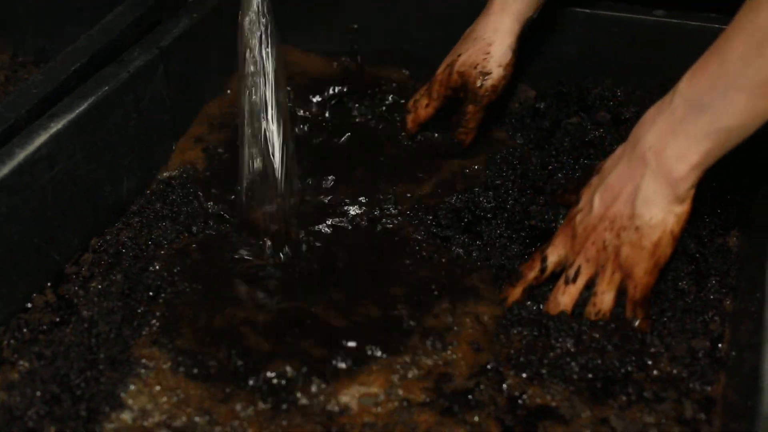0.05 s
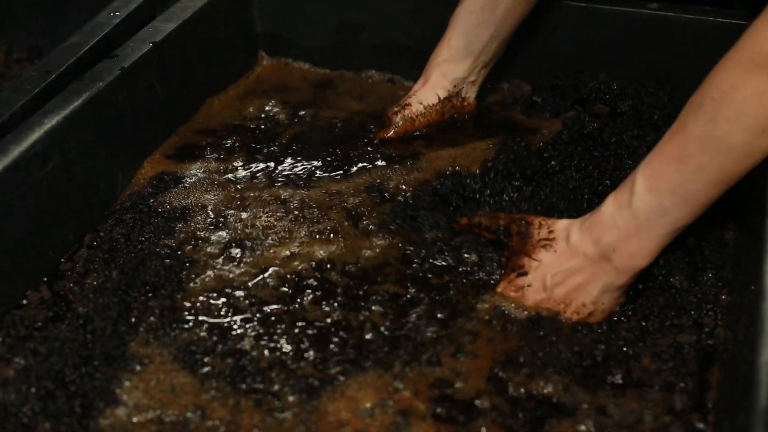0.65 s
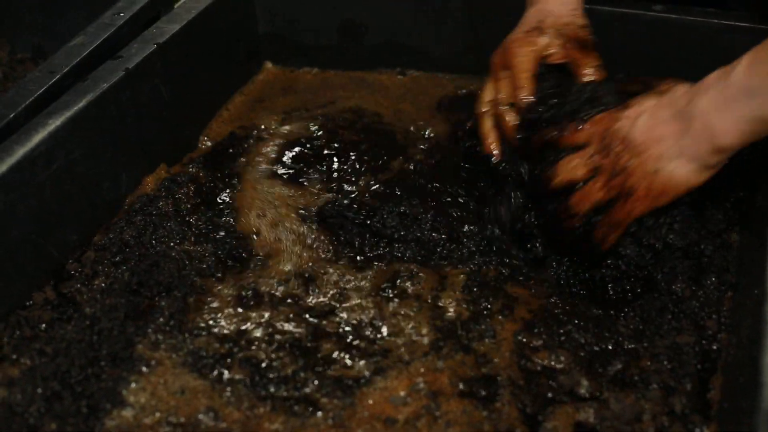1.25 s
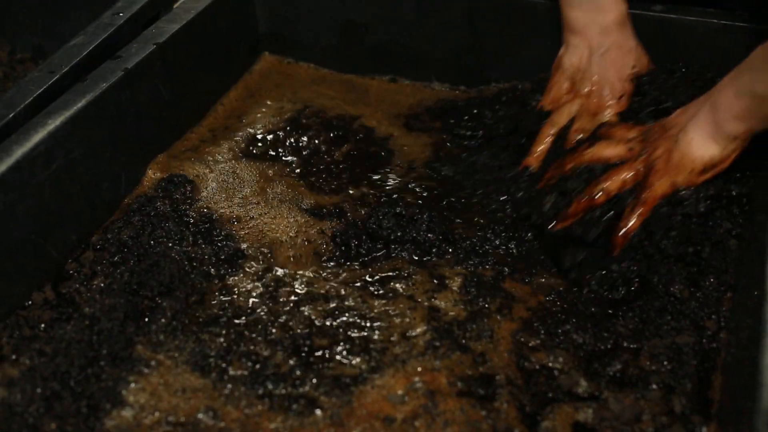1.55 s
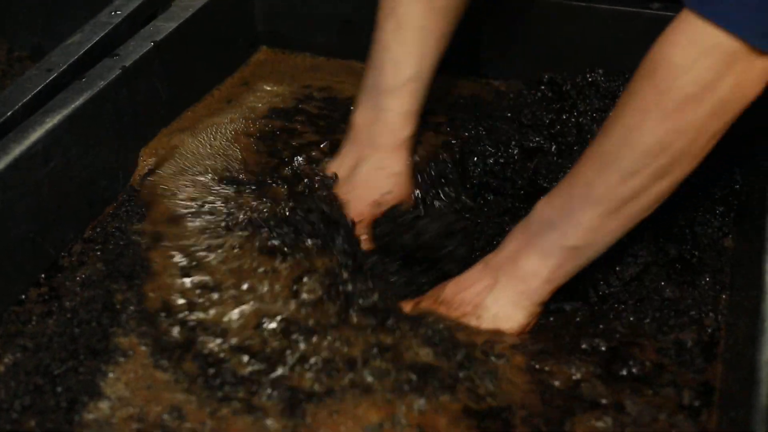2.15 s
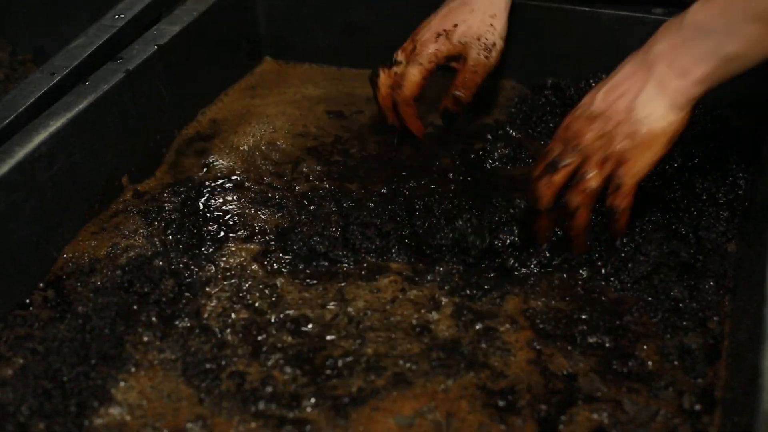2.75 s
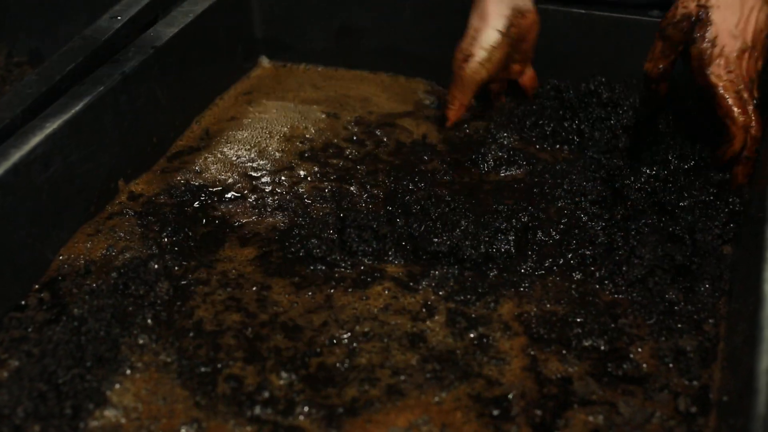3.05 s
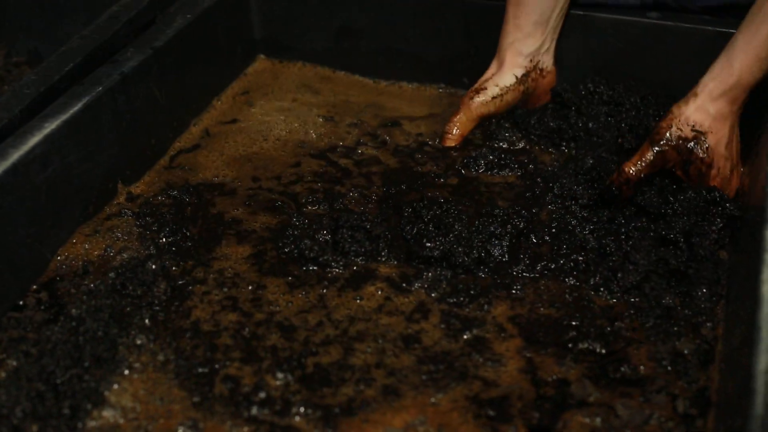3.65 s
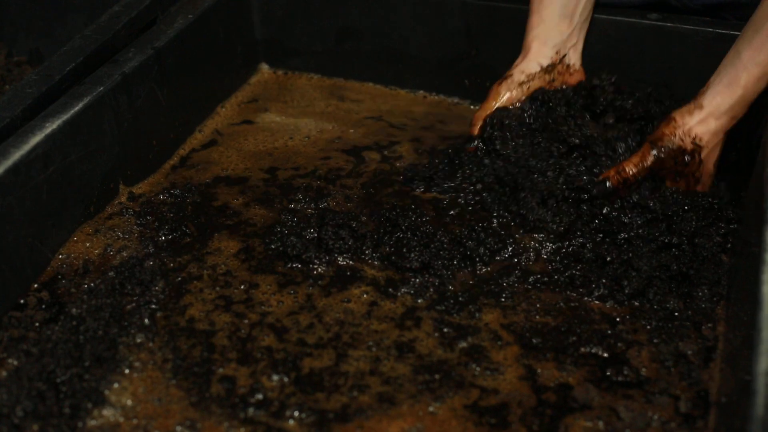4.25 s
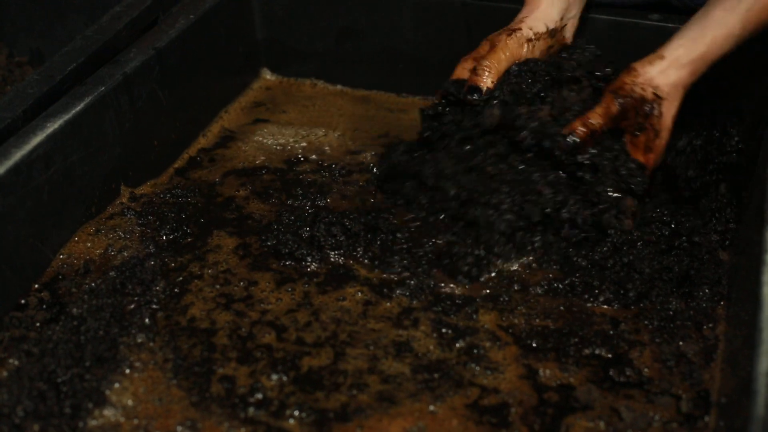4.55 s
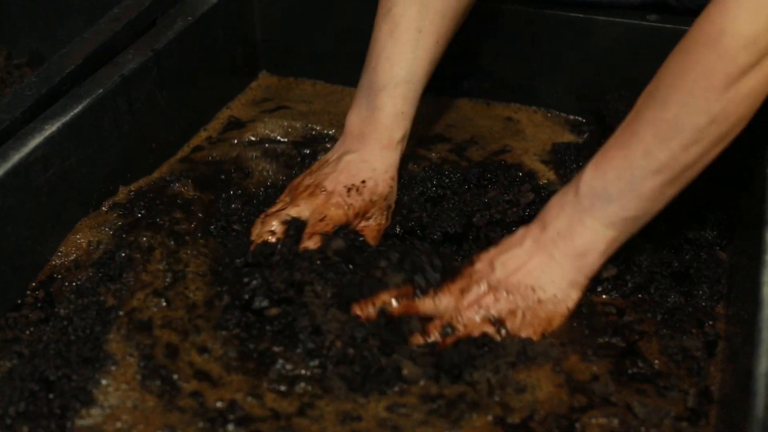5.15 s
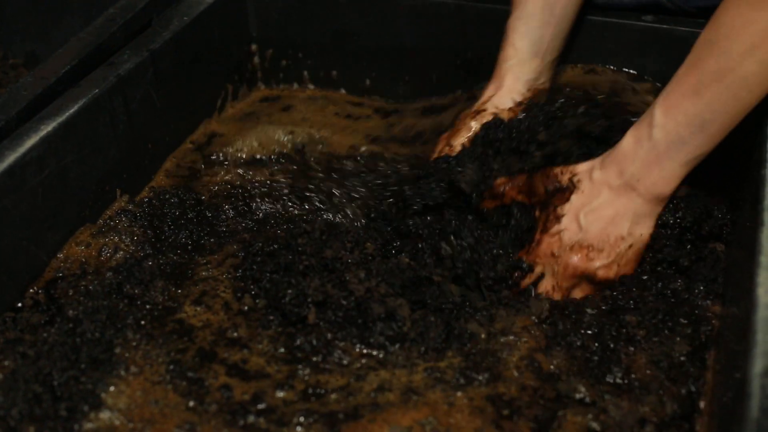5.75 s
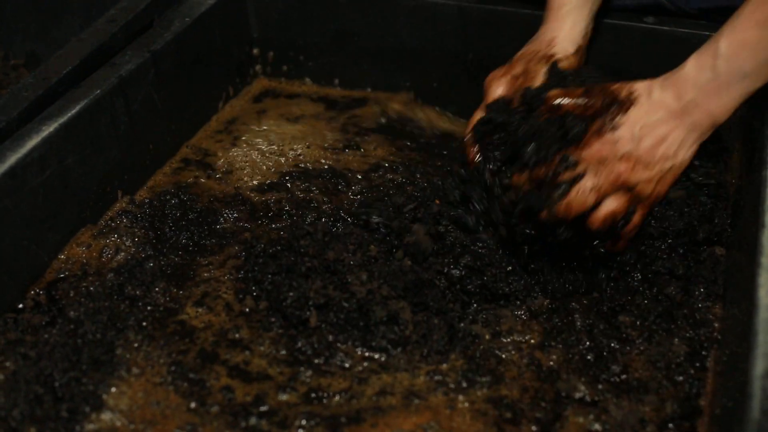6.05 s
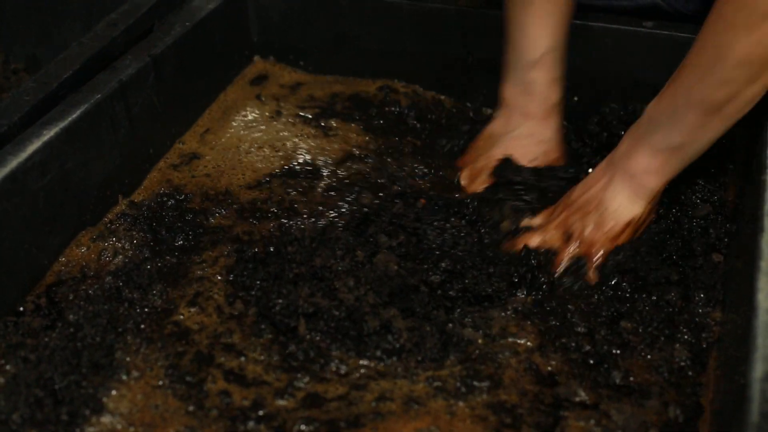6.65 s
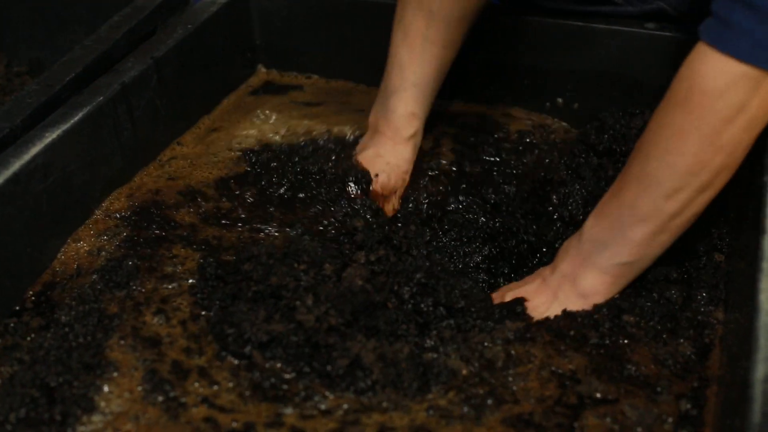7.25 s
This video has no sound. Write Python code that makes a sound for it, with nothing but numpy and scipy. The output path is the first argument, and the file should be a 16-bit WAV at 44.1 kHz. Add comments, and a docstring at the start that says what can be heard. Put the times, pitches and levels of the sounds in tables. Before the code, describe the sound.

A splash of water, then hands squelch and knead wet, grainy mash in a vat, with a few loud, hollow knocks.

```python
"""Hands scoop and knead wet, grainy mash in a vat, close to a single microphone in a quiet workshop.
Grains slip in gritty strokes, wet films smack, air pockets squish and the liquid sloshes underneath.
At the start the last of a stream of water splashes in, leaving bubbles and a thinning, ticking froth.
Around two to three seconds in, a hollow vessel takes a few loud knocks and its thin wall booms.
Behind it all are a short reverberation and the low rumble and hiss of the room."""
import sys
import numpy as np
from scipy import signal
from scipy.io import wavfile

SR = 44100
rng = np.random.default_rng(int(sys.argv[2]) if len(sys.argv) > 2 else 0)


def generate_wav(sig):
    """Save sig (samples, or channels by samples) to the path in sys.argv[1] as 16-bit PCM at SR."""
    pcm = np.round(np.clip(np.atleast_2d(sig).T, -1, 1) * 32767).astype(np.int16)
    wavfile.write(sys.argv[1], SR, pcm)


N = 330309
TIME = np.arange(N) / SR
HZ = np.fft.rfftfreq(4096, 1 / SR) + 1  # frequency axis of the filters

# room tone of the workshop: f/Hz, density/dB
ROOM_SPECTRUM = [(20, -21), (55, -11.5), (110, 3), (300, -1), (700, -4), (1300, -5.5), (2200, -8),
                 (5000, -11), (11000, -18), (16000, -25)]
# reverberation of the workshop: f/Hz, t60/s
ROOM_DECAY = [(150, 0.52), (1000, 0.2), (4000, 0.064), (12000, 0.018)]
# larger air bubbles ringing in the liquid: t/s, level/dB, f/Hz
BUBBLE_PINGS = [(0.048, -21, 810), (.107, -28.5, 890), (0.141, -23.5, 1010), (0.163, -30, 1150),
                (.172, -25, 1350), (0.305, -29, 2780), (0.319, -23, 1077), (.356, -28, 1890),
                (0.432, -32, 1980), (0.453, -28, 302), (1.093, -29, 657), (3.684, -31.5, 2250),
                (4.001, -31, 192), (4.15, -32.5, 2700), (4.237, -26, 5180), (4.307, -31.5, 177),
                (5.916, -30, 276), (6.235, -30, 297)]
# water hitting the surface: f/Hz, density/dB
SPLASH_SPECTRUM = [(70, -61), (180, -7), (270, 0), (450, 0.5), (850, -0.5), (2000, 2.5), (5500, 2.5),
                   (11000, -3.5), (16000, -11)]
# the vessel's wall, struck or dragged: t/s, length/s, level/dB, f/Hz
WALL_BOOMS = [(1.858, 0.025, -15, 326), (2.23, 0.085, -42, 310), (2.367, 0.019, -23.5, 277.4),
              (2.617, .04, -36, 287), (2.67, 0.021, -25, 288), (2.84, 0.038, -35, 260)]
# heavier blows shaking what the vessel stands on: t/s, level/dB
STAND_THUDS = [(1.858, -32), (2.68, -43), (2.845, -42)]
# blows on the vessel: t/s, level/dB, treble corner/Hz, bass gain/dB
VESSEL_BLOWS = [(1.856, -5.5, 2070, 7), (1.861, -10, 734, 14), (1.89, -18, 646, 21),
                (1.93, -18.5, 1120, 18.5), (2.224, -25, 1790, -3), (2.366, -2.5, 4730, -5.5),
                (2.6674, -8, 4720, 0.5), (2.683, -6, 2100, -14), (2.837, -11, 2200, -7.5),
                (2.922, -22.5, 1570, 7.5), (2.965, -29, 2500, -6)]
# the vessel's distinct modes: f/Hz, level/dB, t60/s
VESSEL_MODES = [(138, -12, 0.4), (214, -6, 0.22), (234, -5, 0.3), (331, -5, 0.48), (366, -5, 0.45),
                (470, 1, 0.2), (619, -8, 0.3), (864, -2, 0.19), (1118, -4, 0.2), (1252, 2, 0.13),
                (1575, -8, 0.25), (1886, -7, 0.25), (2545, 1, 0.09)]
# the dense modes of its shell: f/Hz, density/dB
SHELL_SPECTRUM = [(45, -46), (85, -15), (145, -6), (270, 7.5), (420, -3.5), (560, -3.5), (950, 2.5),
                  (1400, 3.5), (2400, -3), (3500, -5), (6000, -7.5), (15000, -13.5)]
# decay of those dense modes: f/Hz, t60/s
SHELL_DECAY = [(100, 0.58), (300, 0.43), (1200, 0.4), (2500, 0.24), (6000, 0.26), (14000, 0.18)]
# liquid moving in the vat: f/Hz, density/dB
SLOSH_SPECTRUM = [(50, -21), (124, 0), (200, -5), (310, 1.5), (700, -8.5), (1700, -14), (5000, -36)]
# the liquid surges and settles: t/s, length/s, level/dB
LIQUID_SURGES = [(0.757, 0.24, -45), (1.38, 1, -47.5), (3.044, 0.47, -39), (3.44, 0.49, -49.5),
                 (4.783, 0.73, -47), (5.454, 0.27, -43.5), (6.712, 0.43, -50)]
# fizz of squeezed mash: f/Hz, density/dB
FIZZ_SPECTRUM = [(300, -30), (660, 7.5), (850, 1.5), (1290, 2), (2950, 0), (3500, -2), (7000, -11.5),
                 (16000, -24)]
# palms press and heave the mash: t/s, length/s, level/dB
PALM_PRESSES = [(0.996, 0.12, -42.5), (1.756, 0.39, -45), (2.264, 0.25, -41), (3.134, 0.3, -48),
                (3.376, 0.35, -49), (3.904, 0.48, -45.5), (4.525, 0.31, -43), (4.826, 0.26, -35.5),
                (5.078, 0.19, -36.5), (5.262, 0.17, -42), (5.455, 0.55, -49)]
# air pockets between hands, mash and vat wall: f/Hz, half width/Hz, peak/dB
AIR_POCKETS = [(1306, 75, 6.5), (2200, 490, 5.5), (3090, 86, 3.5)]
# air forced through a pocket that shrinks or opens: t/s, length/s, level/dB, start f/Hz, end f/Hz
POCKET_SQUISHES = [(1.409, 0.03, -41.5, 1160, 2200), (3.125, 0.038, -42.5, 610, 684),
                   (3.586, 0.055, -50, 2730, 4160), (3.899, 0.02, -45, 2760, 3870),
                   (4.891, 0.21, -43.5, 2800, 3000), (6.084, 0.027, -32.5, 2150, 1970),
                   (6.161, 0.075, -37, 2160, 2400)]
# wet films snapping: t/s, level/dB, centre f/Hz
FILM_SMACKS = [(0.12, -18, 4500), (0.204, -8, 5500), (0.22, -5.5, 4970), (0.335, -17, 3570),
               (0.378, -15.5, 10000), (1.092, -19.5, 1520), (1.099, -22, 4060), (1.157, -25.5, 1060),
               (1.285, -23, 5000), (1.540, -21, 2170), (3.377, -26, 1790), (3.995, -20.5, 1530),
               (4.087, -25, 1460), (4.303, -26.5, 1460), (4.400, -24, 4000), (4.921, -24, 12000),
               (5.336, -26, 1900), (6.303, -28, 2600), (6.4896, -16, 1590), (6.829, -16.5, 2520),
               (6.861, -24.5, 11100), (6.975, -24.5, 6050), (7.303, -26.5, 2480)]
# wet grains slipping: f/Hz, density/dB
GRIT_SPECTRUM = [(300, 2), (600, 4), (1000, -3), (2300, -2.5), (3200, -3), (5000, -5.5), (10000, -17.5),
                 (16000, -41)]
# clumps pulling loose: t/s, level/dB, pocket f/Hz
CLUMP_SQUELCHES = [(1.048, -40, 2000), (1.088, -30.5, 730), (2.242, -31, 1090), (3.993, -29, 1330),
                   (4.087, -33, 1410), (4.232, -38.5, 1850), (4.302, -31.5, 1360), (4.397, -38, 2900),
                   (4.466, -40, 1600), (5.407, -38, 2800), (5.942, -33.5, 2200)]
# fingers raking through the grit: t/s, length/s, level/dB, low edge/Hz
FINGER_STROKES = [(6.088, 0.046, -32.5, 537), (6.161, 0.058, -33, 980), (6.3, 0.11, -34, 600),
                  (6.512, 0.055, -32, 930), (6.591, 0.074, -34.5, 785), (6.766, 0.066, -34.5, 1010),
                  (6.891, 0.032, -34, 640), (7.031, 0.14, -36.5, 790), (7.301, 0.051, -29.5, 500),
                  (7.402, 0.024, -31.5, 700)]


def gain_of(db):
    """Decibels to amplitude."""
    return 10 ** (np.asarray(db) / 20)


def unit_rms(x):
    """Scales to rms 1."""
    return x / np.sqrt(np.mean(x ** 2) + 1e-20)


def curve(points, hz=HZ):
    """A table's values at hz, joined on a log-frequency axis."""
    f, value = np.transpose(points)
    return np.interp(np.log(hz + 1), np.log(f + 1), value)


def add(mix, s, sound):
    """Adds a sound to the mix at time s."""
    part = mix[max(round(s * SR), 0):][:len(sound)]
    part += sound[:len(part)]


def rolloff(ratio, order):
    """Decibels of a filter slope that falls where the ratio passes 1."""
    return -10 * np.log10(1 + ratio ** (2 * order))


def peak(hz, half_width, db):
    """Decibels of a resonant peak along HZ."""
    return db / (1 + ((HZ - hz) / half_width) ** 2)


def colour(x, db):
    """Minimum-phase filter with the gain db along HZ."""
    log_gain = np.log(gain_of(np.r_[db, db[-2:0:-1]]) + 1e-5)
    taps = np.fft.ifft(np.exp(np.conj(signal.hilbert(log_gain)))).real
    return signal.fftconvolve(x, taps[:len(db)])[:len(x)]


def resonate(x, hz, width):
    """A resonance of gain 1 that follows the curve hz."""
    turn = np.exp(2j * np.pi * np.cumsum(hz) / SR)
    pole = np.exp(-np.pi * width / SR)
    return 2 * (turn * signal.lfilter([1 - pole], [1, -pole], x / turn)).real


def wander(n, per_s):
    """A random drift with a spread of about 1."""
    return np.interp(np.arange(n) / SR * per_s, np.arange(SR), rng.standard_normal(SR))


def decay(t, t60):
    """Exponential fall by 60 dB in t60."""
    return np.exp(-np.log(1000) * t / t60)


def push(t, length, rise_s, sag_db, t60):
    """One movement: it builds up, sags while it lasts, then dies away."""
    age = np.maximum(t, 0)
    sag = gain_of(-sag_db * np.minimum(age / length, 1))
    return np.minimum(age / rise_s, 1) * sag * decay(np.maximum(age - length, 0), t60)


def swell(t, width_s):
    """A smooth rise and fall around t = 0."""
    return (1 + (t / width_s / 2) ** 2) ** -3


def crackle(n, per_s, spread_db):
    """Random clicks, many small and a few large; rms 1."""
    size = gain_of(spread_db * np.minimum(rng.exponential(1, n), 4))
    return unit_rms(size * np.sign(rng.standard_normal(n)) * (rng.random(n) < per_s / SR))


def ticks(n, per_s, spread_db, low_hz):
    """Crisp pops of thin films, strongest in the octave above low_hz; rms 1."""
    band_db = rolloff(low_hz / HZ, order=1) + rolloff(HZ / low_hz / 2, order=1)
    return unit_rms(colour(crackle(n, per_s, spread_db), band_db))


def tail(t60s):
    """Dense reflections, each band dying at its own speed; energy 1."""
    hz, t, bands = signal.stft(np.sign(rng.standard_normal(SR // 2)), SR, nperseg=128)
    x = signal.istft(bands * decay(t, curve(t60s, hz)[:, None]), SR)[1]
    return x / np.linalg.norm(x)


def wavering(n, hz):
    """A tone of unsteady pitch; rms 1."""
    pitch = hz * (1 + 0.047 * wander(n, per_s=89.6))
    return unit_rms(np.sin(2 * np.pi * np.cumsum(pitch) / SR))


def room_tone():
    """Steady rumble and hiss of the workshop."""
    return gain_of(-47.5) * unit_rms(colour(rng.standard_normal(N), curve(ROOM_SPECTRUM)))


def froth():
    """Froth left by the pour ticks as it bursts, and slowly fades."""
    start_db, fade_db_per_s = -50.5, 4
    return gain_of(start_db - fade_db_per_s * TIME) * ticks(N, per_s=590, spread_db=2.4, low_hz=4500)


def bubble(hz, t60, glide):
    """A damped tone that rises as the bubble nears the surface."""
    t = np.arange(0, t60, 1 / SR)
    return np.sin(2 * np.pi * hz * t * (1 + glide * t / t60)) * decay(t, t60)


def swarm(n, low_hz, high_hz, per_s, cycles, sizes):
    """Tiny bubbles of many sizes, each size popping per_s times a second and ringing briefly; rms 1."""
    out = np.zeros(n + SR // 4)
    for hz in np.geomspace(low_hz, high_hz, sizes):
        ping = bubble(hz, cycles / hz, glide=0.014) * np.sqrt(hz)
        onset, strength = rng.random((round(per_s * n / SR), 2)).T[:, :, None]
        np.add.at(out, (onset * n).astype(int) + np.arange(len(ping)), strength ** 2 * ping)
    return unit_rms(out[:n])


def bubbles():
    """Single larger bubbles ring up within a cycle; the smallest die soonest."""
    out = np.zeros(N)
    rise_cycles, ring_cycles = 0.45, 114
    for s, db, hz in BUBBLE_PINGS:
        ping = bubble(hz, t60=min(0.035, ring_cycles / hz), glide=0.073)
        add(out, s, gain_of(db) * ping * np.minimum(TIME[:len(ping)] * hz / rise_cycles, 1))
    return out


def pour():
    """The stream splashes and glugs as it drags air under; it is cut off and a last slug follows."""
    out, t = np.zeros(N), TIME[:SR]
    stop_s, slug_s = 0.19, 0.3
    glugs_per_s, first_glug_s = 25, 0.045
    spray = unit_rms(colour(crackle(SR, per_s=3500, spread_db=3.4), curve(SPLASH_SPECTRUM)))
    spray *= gain_of(2 * wander(SR, per_s=161))
    pulses = np.cos(np.pi * glugs_per_s * (t - first_glug_s)) ** 4
    glugs = unit_rms(wavering(SR, hz=268) * pulses * gain_of(3 * wander(SR, glugs_per_s)))
    pings = swarm(SR, low_hz=674, high_hz=6200, per_s=7, cycles=33, sizes=40)
    water = spray + gain_of(-4.5) * pings + gain_of(-14) * glugs
    stream = gain_of(-31.5) * decay(np.maximum(t - stop_s, 0), t60=0.41)
    slug = gain_of(-41.5) * swell(t - slug_s, width_s=0.041)
    add(out, 0, (stream + slug) * water)
    return out


def booms():
    """The vessel's thin wall booms when struck and groans when dragged; its stand thuds underneath."""
    out, t = np.zeros(N), TIME[:SR // 2]
    thud_length_s, thud_hz = 0.03, 90
    thuds = [(s, thud_length_s, db, thud_hz) for s, db in STAND_THUDS]
    for s, length, db, hz in list(WALL_BOOMS) + thuds:
        envelope = push(t, length, rise_s=0.006, sag_db=0, t60=0.21)
        add(out, s, gain_of(db) * wavering(len(t), hz) * envelope)
    return out


def knocks():
    """Each blow on the vessel gives a short crack, a dense clatter of the shell and ringing modes."""
    out, t = np.zeros(N), TIME[:SR // 2]
    hz, mode_db, t60 = np.transpose(VESSEL_MODES)[:, :, None]
    sign = (-1) ** np.arange(len(hz))[:, None]  # neighbouring modes swing opposite ways
    attack = 1 - np.exp(-t / 0.00056)
    for s, db, treble_hz, bass_db in VESSEL_BLOWS:
        spot, grip = rng.standard_normal((2, len(hz), 1))  # both vary from blow to blow
        modes = np.sin(2 * np.pi * hz * (1 + 0.008 * grip) * t) * decay(t, t60)
        ring = (sign * gain_of(mode_db + 2.5 * spot) * modes).sum(0)
        crack = np.sign(rng.standard_normal(len(t))) * decay(t, t60=0.063)
        clatter = tail(SHELL_DECAY)[:len(t)]
        shell = colour(gain_of(4.5) * crack + gain_of(22) * clatter, curve(SHELL_SPECTRUM))
        # soft blows are dull, heavy ones carry more bass
        contact_db = rolloff(HZ / treble_hz, order=1) + rolloff(HZ / treble_hz / 2.33, order=2)
        weight_db = peak(0, 400, bass_db) + rolloff(70 / HZ, order=5)
        blow = (gain_of(-18.5) * ring + shell) * attack
        add(out, s, gain_of(db) * colour(blow, contact_db + weight_db))
    return out


def squishes():
    """Bursting films ring a pocket of air whose pitch slides and flutters as the hand deforms it."""
    out, t = np.zeros(N), TIME[:SR // 2]
    flutter, ragged_flow_db = 0.06, 4
    for s, length, db, from_hz, to_hz in POCKET_SQUISHES:
        hz = np.interp(t, [0, length], [from_hz, to_hz]) * (1 + flutter * wander(len(t), per_s=75.6))
        ring = crackle(len(t), per_s=2500, spread_db=1.5)
        ring *= gain_of(ragged_flow_db * wander(len(t), per_s=158))
        for _ in range(2):
            ring = resonate(ring, hz, width=0.21 * to_hz)
        add(out, s, gain_of(db) * unit_rms(ring) * push(t, length, rise_s=0.0032, sag_db=0, t60=0.076))
    return out


def smacks():
    """Films of liquid burst with a click, and the pocket behind them sputters for a moment."""
    out, t = np.zeros(N), TIME[:SR // 20]
    for s, db, hz in FILM_SMACKS:
        sputter = crackle(len(t), per_s=2200, spread_db=2.5) * decay(t, 0.029 * np.sqrt(2000 / hz))
        treble_db = rolloff(HZ / hz, order=1) + rolloff(HZ / hz / 3, order=1)
        click = colour((t == 0) + 0.24 * sputter, treble_db + rolloff(0.65 * hz / HZ, order=2))
        add(out, s, gain_of(db) * click / abs(click).max())
    return out


def mash(spectrum, spread_db, pings_db):
    """Two seconds of slipping grains and bursting bubbles, heard through the air pockets; rms 1."""
    shape_db = curve(spectrum) + sum(peak(hz, width, db) for hz, width, db in AIR_POCKETS)
    slips = unit_rms(colour(crackle(2 * SR, per_s=7000, spread_db=spread_db), shape_db))
    pings = swarm(2 * SR, low_hz=550, high_hz=14000, per_s=22, cycles=70, sizes=80)
    pings = unit_rms(colour(pings, shape_db + 10 * np.log10(HZ / 2000)))
    return unit_rms(slips + gain_of(pings_db) * pings)


def kneading():
    """Mash fizzes under the palms; the liquid below it sloshes."""
    fizz = np.resize(mash(FIZZ_SPECTRUM, spread_db=3, pings_db=-5.5), N)
    fizz *= gain_of(1.5 * wander(N, per_s=70))
    slosh = unit_rms(colour(crackle(N, per_s=900, spread_db=4.3), curve(SLOSH_SPECTRUM)))
    slosh *= gain_of(1.1 * wander(N, per_s=33))
    pressure = sum(gain_of(db) * push(TIME - s, length, rise_s=0.074, sag_db=3, t60=0.22)
                   for s, length, db in PALM_PRESSES)
    surge = sum(gain_of(db) * push(TIME - s, length, rise_s=0.069, sag_db=8, t60=0.33)
                for s, length, db in LIQUID_SURGES)
    return fizz * pressure + slosh * surge


def scooping():
    """Wet grains slip as fingers rake through them, and clumps pull loose with a short squelch."""
    out, t = np.zeros(N), TIME[:SR // 2]
    bubbly = mash(GRIT_SPECTRUM, spread_db=2, pings_db=-2)
    smooth = mash(GRIT_SPECTRUM, spread_db=3, pings_db=-5)
    pops = gain_of(-14.5) * ticks(2 * SR, per_s=450, spread_db=1.1, low_hz=5000)

    def grit(low_hz, pocket_db=0):
        """Half a second of slipping grains: deep strokes are bubbly, shallow ones thin and bright."""
        depth = np.clip((1100 - low_hz) / 200, 0, 1)
        grains = depth * bubbly + (1 - depth) * smooth + pops
        start = rng.integers(len(grains) - len(t))
        tilt_db_per_octave = np.log2(low_hz / 650)
        octaves = np.log2(np.maximum(HZ, low_hz) / 2000)
        shape_db = rolloff(low_hz / HZ, order=3) + tilt_db_per_octave * octaves + pocket_db
        stroke = unit_rms(colour(grains[start:start + len(t)], shape_db))
        return stroke * gain_of(wander(len(t), per_s=121.8))

    for s, length, db, low_hz in FINGER_STROKES:
        cavity_hz = rng.uniform(1900, 3100)  # each stroke opens a small cavity of its own
        cavity_db = peak(cavity_hz, 0.05 * cavity_hz, db=6)
        envelope = push(t, length, rise_s=0.0015, sag_db=0.5, t60=0.31)
        add(out, s, gain_of(db) * grit(low_hz, cavity_db) * envelope)
    for s, db, hz in CLUMP_SQUELCHES:
        pocket_db = peak(hz, 0.66 * hz, db=14.5) + rolloff(HZ / hz / 9.2, order=1)
        envelope = np.minimum(t / 0.00083, 1) * decay(t, t60=0.17)
        add(out, s, gain_of(db) * grit(0.3 * hz, pocket_db) * envelope)
    # a spray of wet grit swells and dies away as the hands dig in
    dig_s, middle_s = 0.808, t.mean()
    add(out, dig_s - middle_s, gain_of(-26.5) * grit(low_hz=1060) * swell(t - middle_s, width_s=0.057))
    return out


def scene():
    """The vat from close by, in mono, with the workshop's short reverberation 6 ms behind."""
    wet_work = pour() + scooping() + squishes() + kneading()
    blows = knocks() + booms()
    bursts = bubbles() + smacks() + froth()
    send = gain_of(-14) * wet_work + gain_of(-10.5) * bursts + gain_of(-20) * blows
    reverb = np.zeros(N)
    add(reverb, 0.006, signal.fftconvolve(send, tail(ROOM_DECAY)))
    return (wet_work + bursts + blows + reverb + room_tone())[None]


def record(dry):
    """The microphone chain rounds off peaks softly and cuts the top treble."""
    edge_hz = 15950
    lowpass = signal.firwin(511, edge_hz, window=("kaiser", 9), fs=SR)
    return signal.oaconvolve(np.tanh(dry), lowpass[None], "same")


dry = scene()
out = record(dry)
generate_wav(out)
```